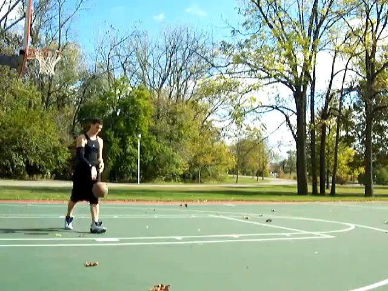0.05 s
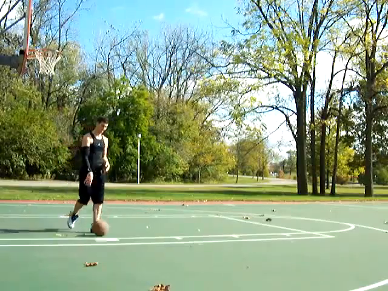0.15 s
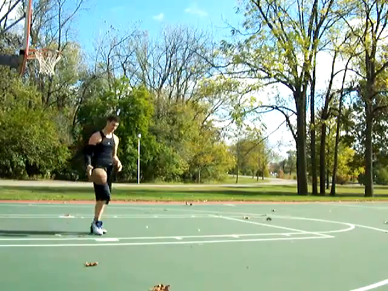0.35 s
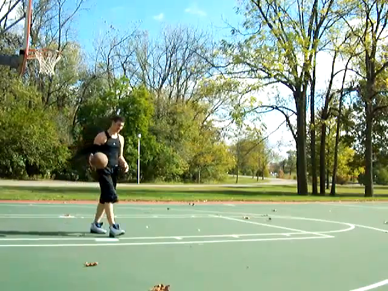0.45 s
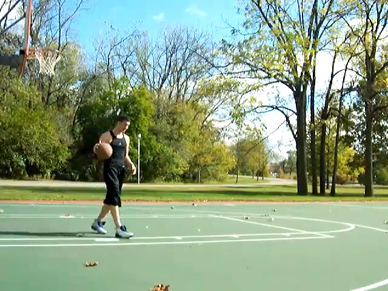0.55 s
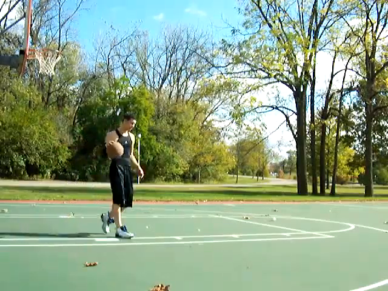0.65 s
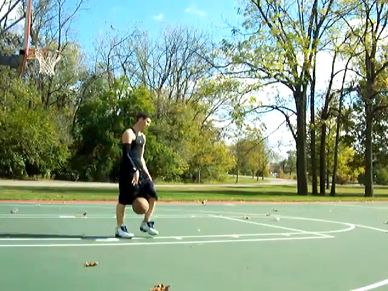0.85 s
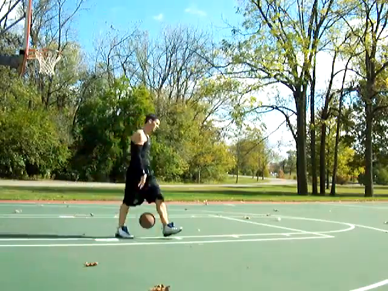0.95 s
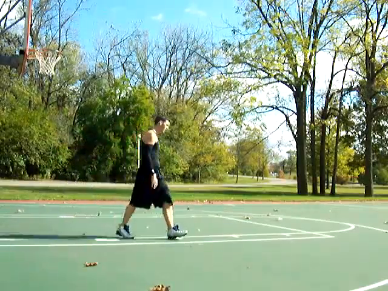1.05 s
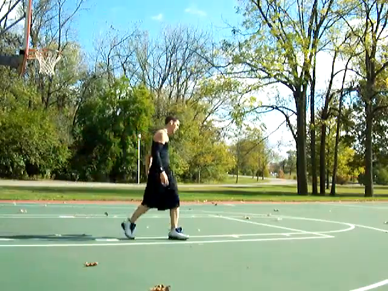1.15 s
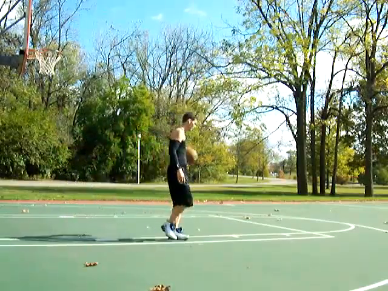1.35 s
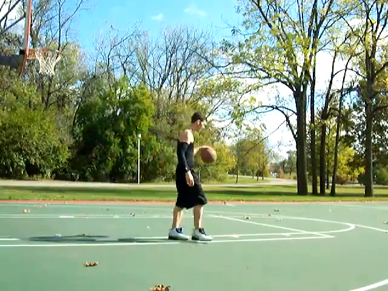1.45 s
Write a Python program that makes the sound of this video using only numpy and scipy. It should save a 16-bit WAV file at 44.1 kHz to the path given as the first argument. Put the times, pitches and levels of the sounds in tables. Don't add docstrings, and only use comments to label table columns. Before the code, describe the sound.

A basketball bounces on a hard outdoor court at about 0.2 seconds, a loud, distorted slap and tight thump with a brief hollow ring. Faint gritty steps and leaf snaps follow around 0.45 seconds. A second bounce at 0.98 is sharper in its slap, with a softer, longer thump. Scuffs return near 1.2 and 1.4. Low wind gusts, strongest near 0.84, and faint tree rustle continue; the background dips after each bounce.

```python
import sys
import numpy as np
from scipy import signal
from scipy.io import wavfile

SR = 44100
rng = np.random.default_rng(int(sys.argv[2]) if len(sys.argv) > 2 else 0)


def gain_from_db(level_db):
    decades = np.asarray(level_db, float) / 20
    return 10 ** decades


def unload_audio(sound):
    columns = np.transpose(np.atleast_2d(sound))
    steps = np.round(np.clip(columns, -1, 1) * 32767)
    wavfile.write(sys.argv[1], SR, steps.astype(np.int16))


N = 66150

# start in seconds, thump level in dB, thump T60 in seconds,
# shell level in dB, drop of the recorder gain in dB.
BOUNCES = [
    (.2114, 1.5, 0.035, -14, 8),
    (0.9812, -2.5, 0.075, -13, 7),
]
# start in seconds, level in dB, pulse width in milliseconds.
SLAPS = [(.21148, 1.5, .5), (.2120, -14, .25), (.2124, -11, .25), (.2129, -17, .5), (.2236, -14, 1.7),
         (.98053, 2, .12), (.98072, 1, .12), (.9810, -9, .3), (.98127, -4, .32), (.98168, -8, .22),
         (.9822, -14, .7), (.9928, -19, 1.7)]
# frequency in Hz, level in dB, T60 in seconds.
SHELL_MODES = [(250, -1, .03), (470, -1, .032), (710, -2, .022), (950, -3, .02), (1380, -5, .014),
               (3300, -8, .007), (5500, -13, .005)]
# frequency in Hz, level in dB, T60 in seconds.
FREE_MODES = [(350, -12, .05), (560, -4, .035), (780, -5, .03), (1250, -4, .02), (1620, -7, .02),
              (2100, -14, .012), (3300, -18, .008)]
# start in seconds, level in dB, pitch factor.
LIFTS = [
    (.2247, -21, 1.0),
    (.9942, -24, 1.04),
]
# level in dB, frequency in Hz, T60 in seconds.
SKIN_RINGS = [(-19, 963, 0.0098), (-19.5, 560, .03), (-19.5, 728, 0.025), (-20, 3620, 0.0049),
              (-25, 2530, 0.0058), (-19, 1600, 0.011), (-7, 2620, 0.0089), (-13.5, 964, 0.0088),
              (-17, 550, 0.019), (-25, 1800, 0.017)]
SKIN_STARTS = [.2119, .2135, .2133, .2116, .2256, .2256, .9810, .9808, .9815, .9945]
# start in seconds, level in dB, frequency in Hz, T60 in seconds.
CAVITY_RINGS = [
    (.2250, -35, 1000, .22),
    (.9945, -44, 1020, .1),
]
# start in seconds, length in seconds, level in dB,
# colour frequency in Hz, share of the length until the peak.
SCUFFS = [(.008, .025, -43.5, 4600, .3), (0.076, 0.011, -62, 3500, 0.37), (0.107, 0.015, -41, 2270, 0.65),
          (0.149, 0.01, -39.5, 2460, 0.35), (0.165, 0.026, -34, 3020, 0.29), (0.202, 0.0053, -42, 5000, .4),
          (0.399, 0.011, -38, 5020, .4), (.441, 0.0063, -38, 6800, .08), (.444, 0.021, -32.5, 2900, 0.6),
          (.489, 0.014, -38.5, 1650, .05), (0.495, 0.0022, -39.5, 5000, 0.041),
          (0.507, 0.065, -36.5, 3150, 0.19), (0.552, 0.029, -42, 4050, .6),
          (0.704, 0.027, -38.5, 3270, 0.53), (0.845, 0.25, -43, 3890, 0.13), (1.174, .02, -32.5, 2690, .45),
          (1.173, 0.015, -43, 7560, .05), (1.201, 0.021, -39.5, 2500, 0.12),
          (1.284, 0.048, -40.5, 3500, 0.19), (1.309, 0.032, -38.5, 2640, 0.31),
          (1.37, 0.0077, -37, 1840, 0.034), (1.384, 0.011, -43, 6440, 0.046),
          (1.386, 0.016, -36, 5000, 0.33), (1.39, 0.021, -34, 2060, 0.41)]
# start in seconds, level in dB, T60 in seconds.
LEAF_SNAPS = [
    (.4415, -28, .035),
    (.4895, -28, .022),
    (1.1725, -31, .05),
    (1.3672, -30, .02),
    (1.218, -35, .02),
]
# time in seconds, level in dB.
GUSTS = [(0, -33), (.04, -29.5), (.07, -40), (.13, -36), (.3, -30.5), (.47, -32), (.56, -25.5), (.62, -35),
         (.78, -33.5), (.835, -17), (.875, -21), (.91, -32), (1.04, -28), (1.08, -34), (1.17, -28),
         (1.25, -35.5), (1.3, -26), (1.4, -32.5)]
# frequency in Hz, level in dB per Hz.
WIND_SPECTRUM = [(12, -31), (20, -4.5), (70, -3.5), (125, -15), (160, -22), (236, -19), (400, -46.5),
                 (520, -50), (880, -120)]
# frequency in Hz, level in dB.
TREE_SPECTRUM = [(100, -16.5), (160, -6.5), (300, -11.5), (760, -12), (1300, -16.5), (2800, -15.5),
                 (4500, -21), (8300, -27)]


def pairs(rows, x, log=False):
    a, b = np.transpose(rows)
    if log:
        return np.interp(np.log(x), np.log(a), b)
    return np.interp(x, a, b)


def rms_one(x):
    return x / np.sqrt(np.mean(x ** 2) + 1e-20)


def decay(since, db, t60):
    return gain_from_db(db - 60 * np.maximum(since, 0) / t60)


def drift(rate):
    r = np.exp(-2 * np.pi * rate / SR)
    noise = rng.standard_normal(N + SR)
    return rms_one(signal.lfilter([1], [1, -2 * r, r * r], noise)[SR:])


def band(x, low_hz, high_hz):
    sos = signal.butter(2, [low_hz, min(high_hz, .45 * SR)], "band", fs=SR, output="sos")
    return signal.sosfilt(sos, x)


def banded_noise(spectrum, patchy_db, rate):
    out = 0
    together = drift(rate / 3)
    white = rng.standard_normal((2, N + 4000))
    edges = 20 * 2 ** np.arange(0, 9.1, .5)
    for k, (low, high) in enumerate(zip(edges, edges[1:])):
        hz = np.sqrt(low * high)
        own = drift(rate)
        if spectrum[0][0] * .8 < hz < spectrum[-1][0] * 1.2:
            level = pairs(spectrum, hz, True) + patchy_db * (together + own)
            out = out + gain_from_db(level) * band(white[k % 2], low, high)[4000:]
    return rms_one(out)


def ringing(since, modes, spread_db, factor=1):
    hz, db, t60 = np.array(modes).T[:, :, None]
    on = np.maximum(since, 0)
    strength = db + spread_db * rng.standard_normal(hz.shape)
    return (decay(on, strength, t60) * np.sin(2 * np.pi * factor * hz * on)).sum(axis=0)


def thump(since, db, t60):
    start_hz, end_hz, sag_s, rise_s = 335, 72, .0019, .002
    on = np.maximum(since, 0)
    turns = end_hz * on + (start_hz - end_hz) * sag_s * (1 - np.exp(-on / sag_s))
    return decay(on, db, t60) * (1 - np.exp(-on / rise_s)) * np.sin(2 * np.pi * turns)


def slaps(t):
    out = np.zeros(N)
    for s, db, ms in SLAPS:
        phase = np.clip((t - s) * 1000 / ms, 0, 1)
        out += gain_from_db(db) * np.sin(np.pi * phase) ** 1.5
    return out


def skin_and_cavity(t):
    out = np.zeros(N)
    skin = [(s, *ring) for s, ring in zip(SKIN_STARTS, SKIN_RINGS)]
    for s, db, hz, t60 in skin + CAVITY_RINGS:
        out += ringing(t - s, [(hz, db, t60)], spread_db=3.5)
    return out


def impacts(t):
    out = np.zeros(N)
    puff = rms_one(band(rng.standard_normal(N), 625, 5000))
    scattered = rms_one(band(rng.standard_normal(N), 400, 8000))
    for s, thump_db, thump_t60, shell_db, _ in BOUNCES:
        since = t - s
        out -= thump(since, thump_db, thump_t60)
        out -= gain_from_db(shell_db) * ringing(since, SHELL_MODES, spread_db=6.0)
        out += decay(since, shell_db - 8, .024) * (since > 0) * puff
        out += decay(since, shell_db - 27, .47) * (since > 0) * scattered
    return out


def lift_offs(t):
    rise_s = .0005
    out = np.zeros(N)
    for s, db, factor in LIFTS:
        rise = 1 - np.exp(-np.maximum(t - s, 0) / rise_s)
        out += gain_from_db(db) * rise * ringing(t - s, FREE_MODES, spread_db=6.0, factor=factor)
    return out


def ball(t):
    return skin_and_cavity(t) - slaps(t) + impacts(t) + lift_offs(t)


def grit_grains():
    grains_per_s, spread_db, clump_db, clump_hz = 9000, 3.2, 1.5, 210
    strength = gain_from_db(spread_db * np.minimum(rng.exponential(1, N), 4))
    sign = rng.choice([-1, 1], N)
    present = rng.random(N) < grains_per_s / SR
    return strength * sign * present * gain_from_db(clump_db * drift(clump_hz))


def footsteps(t):
    octaves = .45
    out = np.zeros(N)
    grit = grit_grains()
    wide = .55 * rms_one(band(grit[::-1], 1300, 9000))
    for s, db, t60 in LEAF_SNAPS:
        out += decay(t - s, db, t60) * (t > s) * wide
    for s, length, db, hz, peak in SCUFFS:
        edges = hz / 2 ** octaves, hz * 2 ** octaves
        body = band(band(grit, *edges), *edges)
        shape = np.interp((t - s) / length, [0, np.clip(peak, .02, .9), 1], [0, 1, 0]) ** .6
        body = body / np.sqrt(np.mean(body[shape > 0] ** 2))
        out += gain_from_db(db) * shape * (body + wide)
    return out


def wind(t):
    return gain_from_db(pairs(GUSTS, t)) * banded_noise(WIND_SPECTRUM, patchy_db=1.0, rate=14)


def trees():
    return gain_from_db(-39) * banded_noise(TREE_SPECTRUM, patchy_db=1.68, rate=15.7)


def scene():
    t = np.arange(N) / SR
    buffeting = wind(t)
    rustle = trees()
    return (ball(t) + footsteps(t) + buffeting + rustle)[None]


def band_limit(x):
    return signal.sosfilt(signal.butter(12, 8390, fs=SR, output="sos"), x)


def record(dry):
    wait_s, duck_s, recover_db_per_s = .015, .0093, 4.5
    cutoff_hz, ceiling = 8250, 1.0
    t = np.arange(N) / SR
    drops = []
    for s, *_, db in BOUNCES:
        onset = np.clip((t - s - wait_s) / duck_s, 0, 1)
        drops.append(onset * np.maximum(db - recover_db_per_s * (t - s), 0))
    gain = gain_from_db(-np.max(drops, axis=0))
    clipped = np.clip(dry * gain, -ceiling, ceiling)
    low_pass = signal.cheby2(10, 30, cutoff_hz * 1.038, fs=SR, output="sos")
    mix = np.clip(signal.sosfiltfilt(low_pass, clipped), -1, 1)
    return band_limit(mix)


dry = scene()
out = record(dry)
unload_audio(out)
```